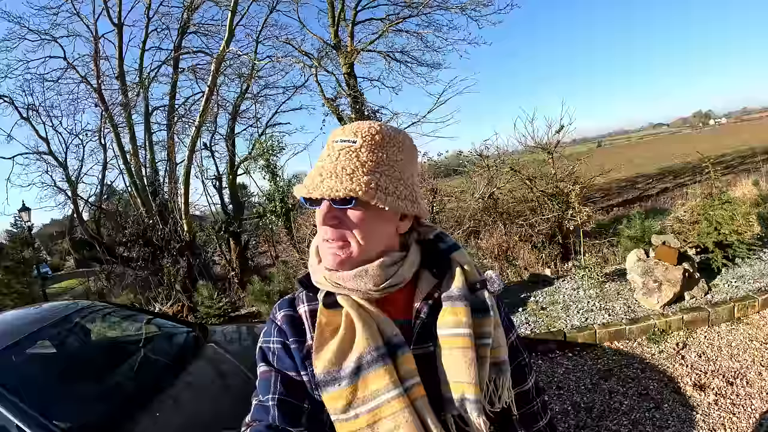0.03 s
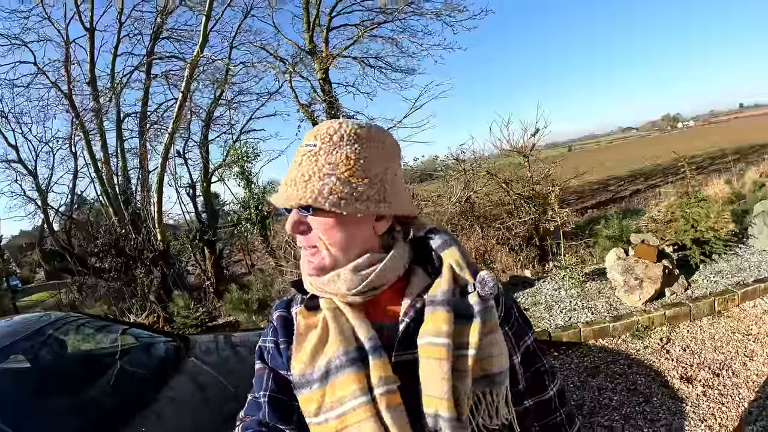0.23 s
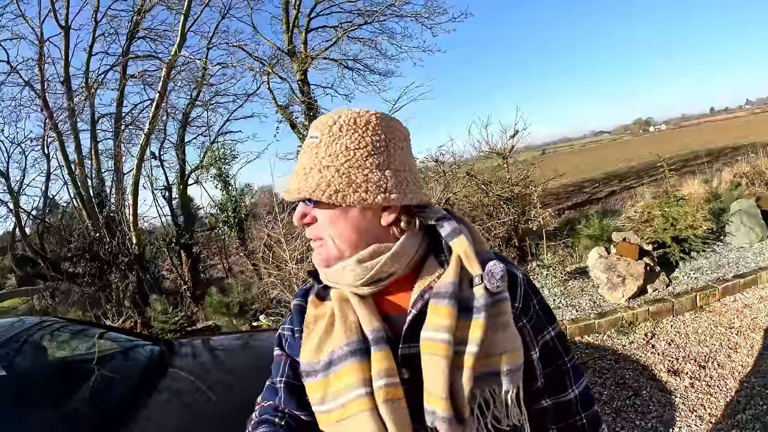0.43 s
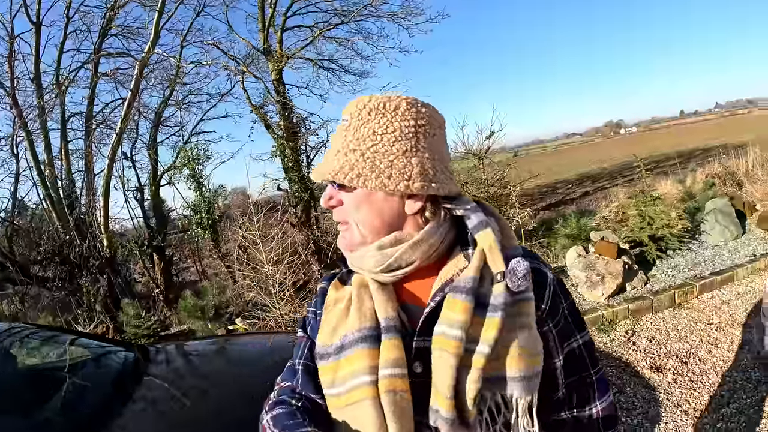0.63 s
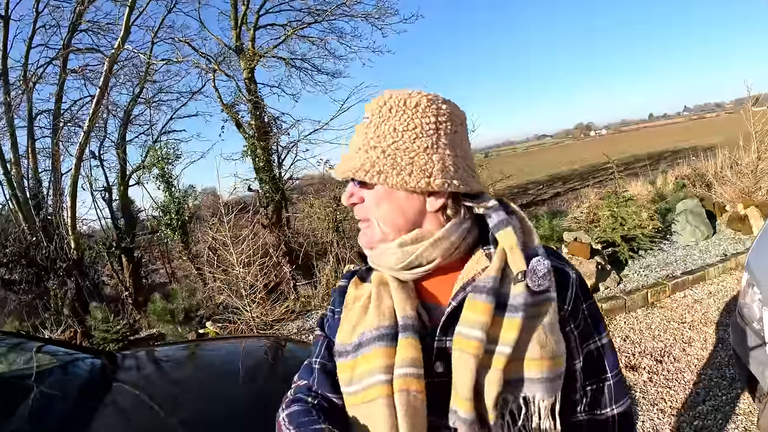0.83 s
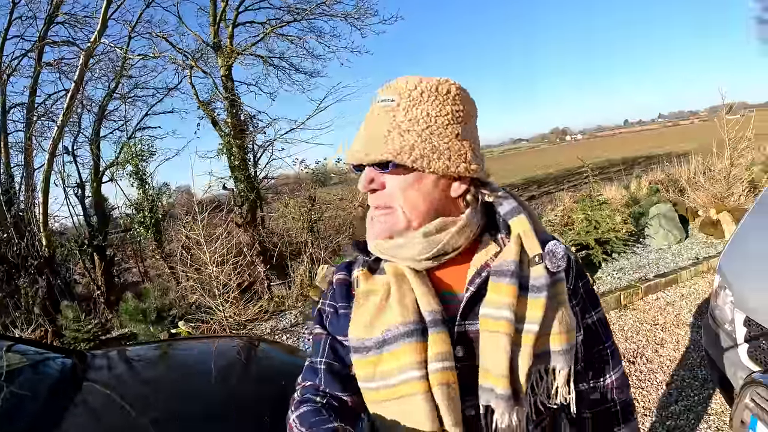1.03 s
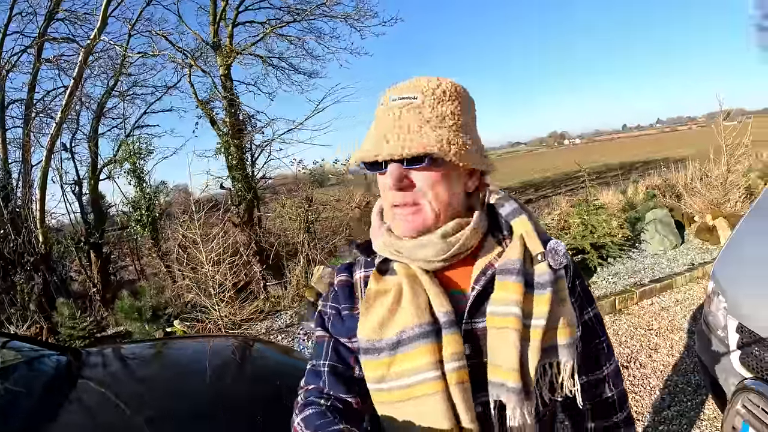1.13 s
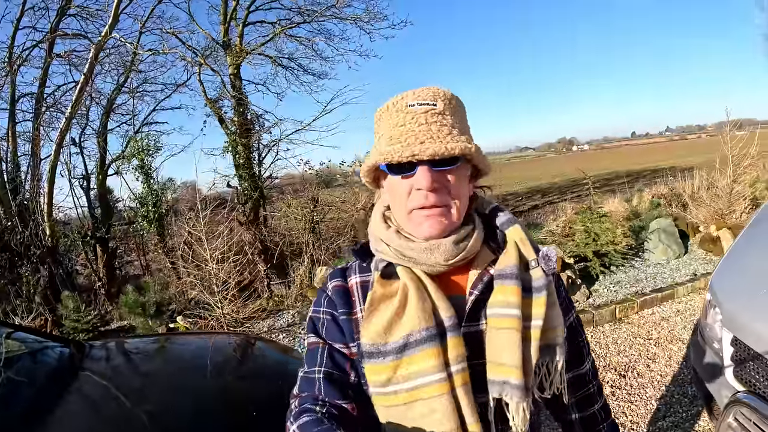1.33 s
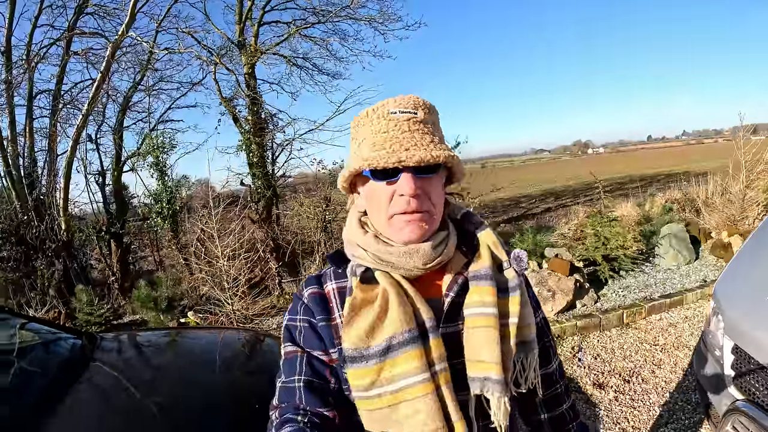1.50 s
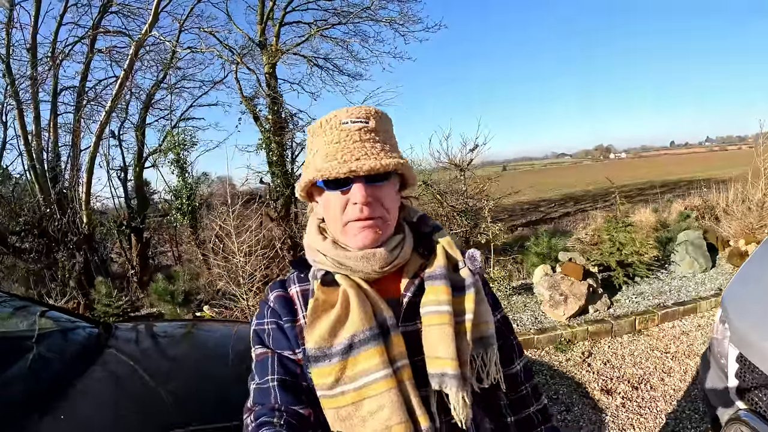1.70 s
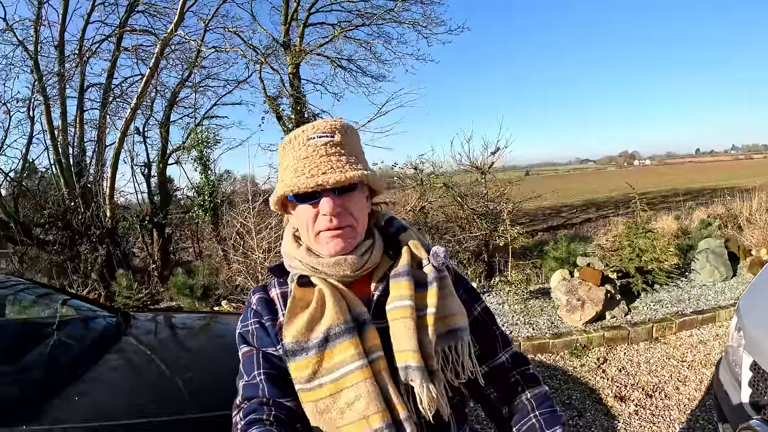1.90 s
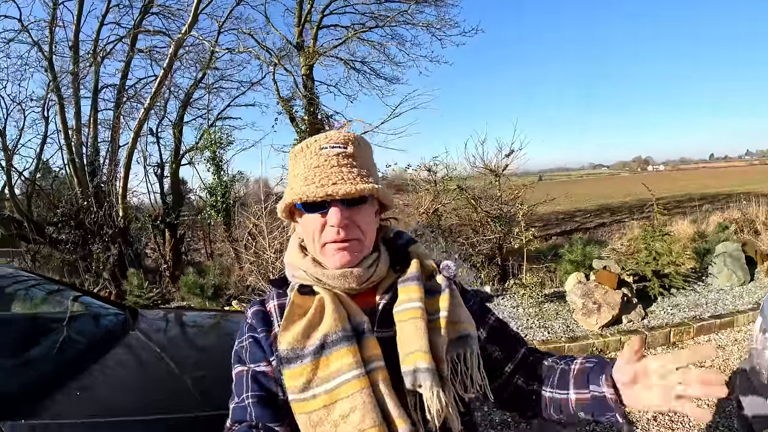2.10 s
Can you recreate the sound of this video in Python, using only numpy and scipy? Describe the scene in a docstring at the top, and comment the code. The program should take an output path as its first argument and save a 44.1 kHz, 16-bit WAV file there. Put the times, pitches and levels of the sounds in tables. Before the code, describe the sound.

Footsteps crunch on gravel close by, over a faint hush of country air. The first lands with a low thud at about 0.25 seconds, as small birds chirp far off until 0.5. The loudest crunches come around 0.75 and 1 second, with clicking stones, then duller ones from 1.3 to 1.5. Lighter steps follow from 1.7 to 2 seconds, while a bird gives a faint falling whistle.

```python
"""Faint country air fades in, riding on a slowly settling offset of the recorder. Small birds chirp far
off, answered by a hedge. Footsteps crunch on a gravel drive, the first with a low thud: each press of a
shoe grinds stones (a low crunch, a dull knock of the sole, a bright grit), stones click and heels thud
softly. Over the last steps a bird gives a falling whistle."""
import sys
import numpy as np
from scipy import signal
from scipy.fft import rfft, irfft, next_fast_len
from scipy.io import wavfile
from scipy.ndimage import uniform_filter1d, map_coordinates

SR = 44100
rng = np.random.default_rng(int(sys.argv[2]) if len(sys.argv) > 2 else 0)


def bounce(signal):
    """Save signal as a 16-bit WAV file at the path given by the first command-line argument."""
    frames = np.transpose(np.atleast_2d(signal))
    limited = np.clip(frames, -1, 1)
    pcm = np.round(limited * 32767).astype(np.int16)
    wavfile.write(sys.argv[1], SR, pcm)


N = 94815


def amp(db):
    return 10 ** (np.asarray(db) / 20)


def unit_rms(x):
    return x / np.sqrt(np.mean(x ** 2) + 1e-20)


def gain_at(points, hz):
    """Gain from (Hz, dB) points joined on a log frequency axis."""
    point_hz, db = np.transpose(points)
    return amp(np.interp(np.log(hz + 1), np.log(point_hz + 1), db))


def filtered(x, response):
    """Zero-phase filter; response maps Hz to gain."""
    size = next_fast_len(N + SR // 2)
    return irfft(rfft(x, size) * response(np.fft.rfftfreq(size, 1 / SR)), size)[..., :N]


def wobble(rate_hz):
    """Smooth random curve through rate_hz knots a second."""
    knots = rng.standard_normal(int(N * rate_hz / SR) + 4)
    return map_coordinates(knots, [np.arange(N) * rate_hz / SR])


# Air spectra, mid and side. Each row: frequency in Hz, density in dB per Hz.
AIR_MID_SPECTRUM = [(60, -109.9), (120, -110.7), (200, -114.1), (320, -103.8), (600, -106.4),
                    (1100, -107.9), (1700, -114.0), (3000, -113.2), (6000, -117.5), (9000, -123.1),
                    (13000, -127.7)]
AIR_SIDE_SPECTRUM = [(60, -107.4), (120, -119.3), (200, -132.3), (320, -120.9), (600, -116.0),
                     (1100, -117.3), (3000, -120.9), (6000, -123.7), (9000, -126.8), (13000, -130.0)]


def air(patch_db=1):
    """Faint stereo hush, its gain uneven in patches of time and frequency."""
    bins = signal.stft(rng.standard_normal((2, N)), nperseg=512)[2]
    patches = uniform_filter1d(rng.standard_normal(bins.shape[1:]), size=6, axis=0)
    patches = unit_rms(uniform_filter1d(patches, size=6, axis=1))
    noise = np.sqrt(SR / 2) * signal.istft(bins * amp(patch_db * patches), nperseg=512)[1][:, :N]
    spectra = [[(12, -106)] + points for points in (AIR_MID_SPECTRUM, AIR_SIDE_SPECTRUM)]
    mid, side = filtered(noise, lambda hz: [gain_at(points, hz) for points in spectra])
    return np.array([mid + side, mid - side])


# Bird chirps. Each row: start in s, length in s, start pitch in Hz, end pitch in Hz, glide in s,
# level in dB.
BIRD_CHIRPS = [(0.164, 0.031, 4940, 5090, 0.018, -69), (.192, .05, 5700, 5050, .032, -72),
               (.25, .076, 6500, 5000, .046, -67.5), (.307, .073, 6400, 5000, .043, -68.5),
               (.38, .087, 6600, 5050, .055, -69), (.444, .088, 6450, 5050, .038, -66),
               (.45, .065, 4700, 3200, .03, -76), (1.692, .024, 3400, 4150, .022, -73.5)]


def bird_chirps(peak_share=.68, flutter_db=3, waver_hz=30):
    """Each chirp glides to its end pitch and holds it, unsteady in pitch and level."""
    t, out = np.arange(N) / SR, np.zeros(N)
    for start_s, length_s, start_hz, end_hz, glide_s, db in BIRD_CHIRPS:
        progress = np.clip((t - start_s) / length_s, 0, 1)
        glide_left = np.clip(1 - progress * length_s / glide_s, 0, 1) ** 1.1
        hz = end_hz + (start_hz - end_hz) * glide_left + waver_hz * wobble(130)
        triangle = np.minimum(progress / peak_share, (1 - progress) / (1 - peak_share))
        swell = np.sin(np.pi / 2 * triangle) ** 2.2
        gain = amp(db + 1.5 + flutter_db * wobble(129.5))
        out += gain * swell * np.sin(2 * np.pi * np.cumsum(hz) / SR)
    return out


def hedge_echo(x, echo_db=-11, t60_s=.12):
    """The sound plus the short diffuse tail that the hedge returns."""
    t = np.arange(SR // 5) / SR
    tail = rng.standard_normal(len(t)) * amp(-60 * t / t60_s)
    return x + amp(echo_db) * signal.fftconvolve(x, tail / np.linalg.norm(tail))[:N]


def impacts(start_s, hz, decay_cycles, gain, samples):
    """One damped sine per impact, summed at their start times."""
    cycles = np.arange(samples) / SR * hz[:, None]
    attack = np.clip(2 * cycles, 0, 1)
    waves = gain[:, None] * np.sin(2 * np.pi * cycles) * np.exp(-cycles / decay_cycles) * attack
    index = (start_s * SR).astype(int)[:, None] + np.arange(samples)
    return np.bincount(index.ravel(), waves.ravel(), N + samples)[:N]


def stone_knocks(pitch_hz, log_spread, decay_cycles, scatter_db, count, samples):
    """Stones knocking at random moments, of like energy whatever their pitch."""
    start_s = rng.uniform(0, N / SR, count)
    index = (start_s * SR).astype(int)
    detune = np.exp(np.broadcast_to(log_spread, N)[index] * rng.standard_normal(count))
    hz = np.clip(pitch_hz[index] * detune, 100, SR / 3)
    gain = amp(scatter_db * rng.exponential(size=count)) * np.sqrt(hz / 1000)
    return impacts(start_s, hz, decay_cycles, gain, samples)


# What the stones pass on. Each row: frequency in Hz, gain in dB.
STONE_RESPONSE = [(120, -10.5), (200, -12), (260, -2), (1250, -2.5), (1550, -10), (2400, -13), (6000, -43)]


def through_stones(knocks):
    """Knocks dulled by the stones, at unit RMS."""
    return unit_rms(filtered(knocks, lambda hz: gain_at(STONE_RESPONSE, hz)))


# Grit spectrum. Each row: frequency in Hz, relative level in dB.
GRIT_SPECTRUM = [(1530, -9.5), (2780, -7.5), (4230, -9.5), (5090, -6.5), (9540, -15), (10800, -35.5),
                 (12400, -23), (15500, -50)]


def grit(power, ring_hz, lift_db=14, ring_db=-4.5, fine_hz=8200, fine_exponent=.083):
    """Small stones grind brightly and some ring; above fine_hz the grit grows faster with pressure."""
    knocks = stone_knocks(np.full(N, 6000), .783, 1.54, scatter_db=1.52, count=20000, samples=64)
    bins = signal.stft(knocks, nperseg=2048)[2]
    bin_rms = np.sqrt(np.mean(abs(bins) ** 2, axis=1, keepdims=True))
    white = signal.istft(bins / bin_rms, nperseg=2048)[1][:N]
    bright = filtered(white / np.std(white), lambda hz: gain_at(GRIT_SPECTRUM, hz))
    fine = filtered(bright, lambda hz: 1 / (1 + (fine_hz / (hz + 1)) ** 8))
    grinding = bright - fine + fine * (power / power.max()) ** fine_exponent
    ringing = stone_knocks(ring_hz, .02, 15, scatter_db=1.3, count=1500, samples=700)
    return np.sqrt(power) * (amp(lift_db) * grinding + amp(ring_db) * unit_rms(ringing))


# Shoe presses. Each row: peak time in s, rise in s, fall in s, crunch level in dB, crunch pitch in Hz,
# its spread in natural log units, sole level in dB, grit level in dB, grit ring in Hz.
SHOE_PRESSES = [(0.247, 0.045, 0.059, -53, 1131, 0.2, -68.5, -74, 3180),
                (0.334, 0.022, 0.31, -67, 1160, 0.26, -73, -80, 3120),
                (.58, 0.17, 0.25, -72, 850, 0.35, -101, -81, 1880),
                (0.739, .03, 0.012, -49.5, 760, 0.43, -68, -52.5, 5140),
                (0.758, 0.018, 0.017, -44, 928, 0.38, -56.5, -52, 5100),
                (0.808, 0.04, 0.14, -60, 754, 0.39, -95, -69.5, 3290),
                (.902, 0.015, 0.011, -51.5, 775, 0.36, -61, -65, 3160),
                (0.939, 0.036, 0.021, -45.5, 912, 0.13, -58, -69.5, 3050),
                (0.977, 0.029, 0.017, -41.5, 1004, 0.28, -48.5, -51.5, 2044),
                (1.01, 0.011, 0.041, -57.5, 776, 0.307, -60, -63.5, 3200),
                (1.242, 0.023, 0.087, -66, 610, 0.32, -65, -75.5, 6460),
                (1.295, 0.012, 0.065, -54.5, 605, 0.29, -47.5, -71, 2810),
                (1.353, 0.012, 0.063, -54, 480, 0.22, -51.5, -61, 3334),
                (1.438, 0.035, 0.038, -47.5, 565, 0.28, -46.5, -60.5, 6550),
                (1.488, 0.051, 0.11, -59, 545, 0.23, -60, -74.5, 6000),
                (1.76, 0.022, 0.065, -61, 877, 0.33, -66, -76, 1990),
                (1.906, 0.032, 0.05, -58, 952, 0.18, -61.5, -74.5, 3760),
                (1.999, 0.06, 0.26, -73, 847, 0.2, -78, -100, 4040)]


def shoe_presses(slope_db=10, rise_exponent=1.64):
    """Each press drives crunch, sole knock and grit; pitches follow the strongest presses."""
    peak_s, rise_s, fall_s, crunch_db, hz, spread, sole_db, grit_db, ring_hz = (
        np.transpose(SHOE_PRESSES)[..., None])
    age_s = np.arange(N) / SR - peak_s
    drop_db = slope_db * np.where(age_s < 0, abs(age_s / rise_s) ** rise_exponent, age_s / fall_s)
    crunch_power, sole_power, grit_power = (
        10 ** ((db - drop_db) / 10) + 1e-30 for db in (crunch_db, sole_db, grit_db))
    share = crunch_power / crunch_power.sum(0)
    crunch_hz = np.exp((share * np.log(hz)).sum(0))
    log_spread = (share * spread).sum(0)
    sole_hz = 315.6 * (crunch_hz / 700) ** .65
    crunch = stone_knocks(crunch_hz, log_spread, 3.3, scatter_db=1.75, count=2600, samples=800)
    sole = stone_knocks(sole_hz, .18, 2.65, scatter_db=1.5, count=1200, samples=1500)
    return (np.sqrt(crunch_power.sum(0)) * through_stones(crunch)
            + np.sqrt(sole_power.sum(0)) * through_stones(sole)
            + grit(grit_power.sum(0), ring_hz[grit_power.argmax(0), 0]))


# Single stone clicks, and one low thud of the first step. Each row: start in s, level before the
# low-pass in dB, pitch in Hz.
CLICKS_AND_THUD = [(0.2385, -35.5, 1120), (0.242, -51.5, 188), (0.2485, -34, 1160), (0.336, -43.5, 1190),
                   (0.5043, -54, 520), (0.5646, -55, 550), (0.5899, -54, 605), (0.6989, -48, 765),
                   (0.7274, -40, 730), (0.7575, -28.5, 1080), (0.9018, -39, 870), (0.9362, -36, 785),
                   (0.9529, -28.5, 1060), (0.962, -27.5, 828), (0.9662, -26.5, 1230), (0.98, -26.5, 984),
                   (1.0089, -40.5, 774), (1.0283, -38, 950), (1.2874, -42.5, 650), (1.4069, -44.5, 700),
                   (1.4244, -37, 800), (1.688, -48, 1006), (1.7452, -51.5, 594), (1.8259, -45.5, 1070),
                   (1.8921, -44, 1080), (2.0837, -53.5, 593)]


def clicks_and_thud(lowpass_hz=1700):
    """Stone clicks and one low thud of the first step, each ringing for a few cycles."""
    start_s, db, pitch_hz = np.transpose(CLICKS_AND_THUD)
    rings = impacts(start_s, pitch_hz, decay_cycles=1.8, gain=amp(db), samples=1200)
    return filtered(rings, lambda hz: 1 / np.sqrt(1 + (hz / lowpass_hz) ** 4))


# Heel landings. Each row: centre time in s, level in dB.
HEEL_THUDS = [(0.243, -60.5), (0.322, -71), (0.72, -67), (0.927, -79), (0.972, -59), (1.213, -72),
              (1.297, -64.5), (1.364, -66.5), (1.712, -67.5)]


def heel_thuds(pitch_hz=110, sigma_s=.011):
    """A heel lands with a soft bump: a low sine under a Gaussian envelope."""
    centre_s, db = np.transpose(HEEL_THUDS)[..., None]
    age_s = np.arange(N) / SR - centre_s
    envelope = amp(db + 3) * np.exp(-.5 * (age_s / sigma_s) ** 2)
    return (envelope * np.sin(2 * np.pi * pitch_hz * age_s)).sum(0)


# Small pebbles. Each row: start in s, level per hit in dB, pitch in Hz.
PEBBLE_TICKS = [(.335, -63, 2560), (.564, -63, 2220), (.626, -66, 7950), (0.7549, -49, 1980),
                (1.073, -62, 8440), (1.217, -64.5, 4260), (1.243, -57.5, 4760), (1.288, -60, 9000),
                (1.288, -67, 2400), (1.35, -56, 8850), (1.359, -62, 3000), (1.746, -65.5, 2330),
                (1.826, -71, 2750)]


def pebble_ticks(hits=4, rattle_s=.007):
    """A pebble rattles in a few high, short, detuned hits."""
    start_s, db, pitch_hz = np.repeat(np.transpose(PEBBLE_TICKS), hits, axis=1)
    delay, detune = rng.uniform(size=(len(start_s), 2)).T
    hit_hz = pitch_hz * (.85 + .3 * detune)
    return impacts(start_s + rattle_s * delay, hit_hz, decay_cycles=4, gain=amp(db), samples=300)


# Whistle fundamental. Each row: time in s, pitch in Hz, level in dB.
WHISTLE_CURVE = [(1.8, 3441, -86), (1.828, 3172, -83), (1.85, 3079, -75), (1.877, 3012, -92),
                 (1.884, 2997, -75), (1.918, 2882, -71), (1.948, 2859, -87), (1.972, 2834, -72),
                 (2.004, 2785, -88), (2.024, 2804, -77), (2.046, 2820, -79), (2.056, 2825, -95),
                 (2.066, 2847, -85), (2.09, 2854, -85), (2.124, 2823, -84)]
# Its octave. Each row: time in s, level in dB.
OCTAVE_CURVE = [(1.812, -98), (1.828, -75), (1.84, -85), (1.856, -79), (1.885, -96), (1.998, -102),
                (2.008, -83), (2.058, -80), (2.068, -93), (2.114, -85), (2.125, -102)]


def bird_whistle():
    """A falling tone and its octave, each pulsing along its own level curve."""
    t, out = np.arange(N) / SR, np.zeros(N)
    time_s, hz, db = np.transpose(WHISTLE_CURVE)
    phase = 2 * np.pi * np.cumsum(np.interp(t, time_s, hz)) / SR
    for harmonic, (knot_s, knot_db) in enumerate([(time_s, db), np.transpose(OCTAVE_CURVE)], start=1):
        level_db = np.interp(t, knot_s, knot_db + 3, left=-140, right=-140)
        out += uniform_filter1d(amp(level_db), size=200) * np.sin(harmonic * phase)
    return out


# Side share of steps and birds. Each row: frequency in Hz, gain in dB.
SIDE_RESPONSE = [(300, -51), (1000, -47), (3000, -21), (10000, -14)]


def scene():
    """Steps and birds sit in the middle, their treble slightly scattered to the sides, over the air."""
    steps = shoe_presses() + clicks_and_thud() + heel_thuds() + pebble_ticks()
    mid = steps + hedge_echo(bird_chirps() + bird_whistle())
    scatter = rng.standard_normal(600) * np.exp(-np.arange(600) / 120)
    scattered = signal.fftconvolve(mid, scatter / np.linalg.norm(scatter))[:N]
    side = filtered(scattered, lambda hz: gain_at(SIDE_RESPONSE, hz))
    return np.array([mid + side, mid - side]) + air()


# Recorder offset, left then right. Each row: size as a share of full scale, time constant in s.
RECORDER_OFFSET = [(.262, .929), (.269, .92)]


def record(dry, top_hz=15700, build_s=.08, fade_start_s=.15, fade_s=.1):
    """The recorder limits the band and adds a negative offset that builds and settles; all fades in."""
    t = np.arange(N) / SR
    offset = np.array([-size * np.exp(-t / settle_s) for size, settle_s in RECORDER_OFFSET])
    offset *= 1 - np.exp(-t / build_s)
    fade = np.sin(np.pi / 2 * np.clip((t - fade_start_s) / fade_s, 0, 1)) ** 2
    return fade * (filtered(dry, lambda hz: hz < top_hz) + offset)


dry = scene()
out = record(dry)
bounce(out)
```